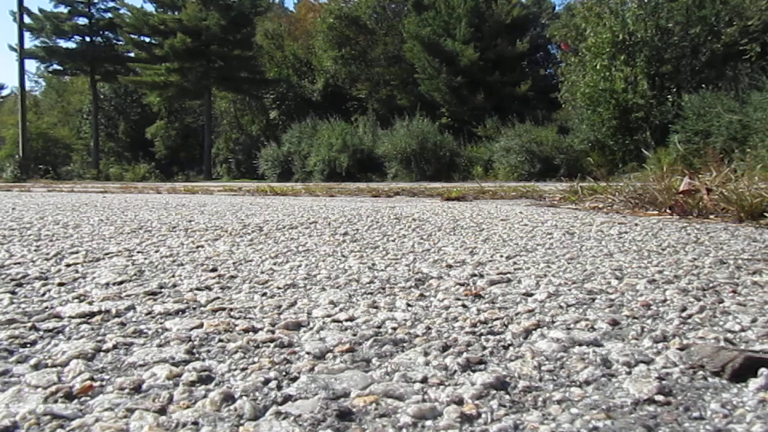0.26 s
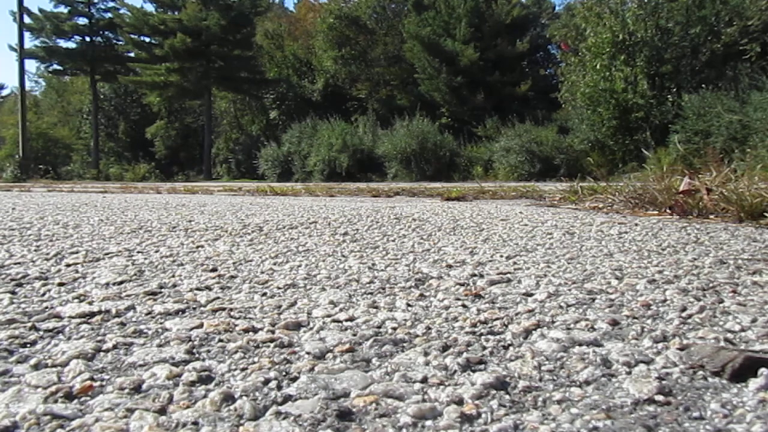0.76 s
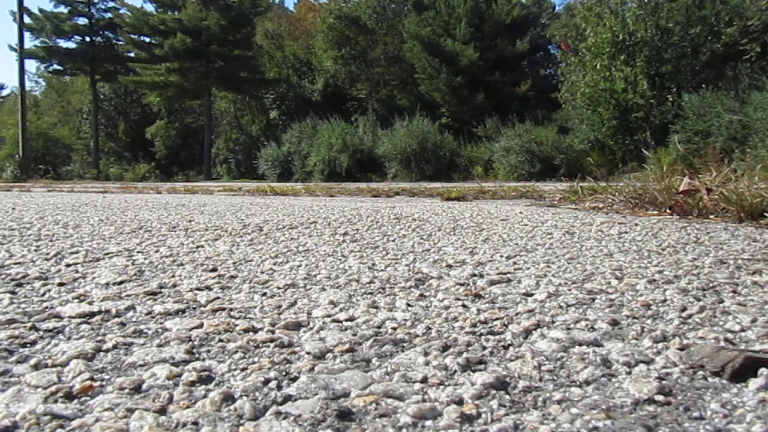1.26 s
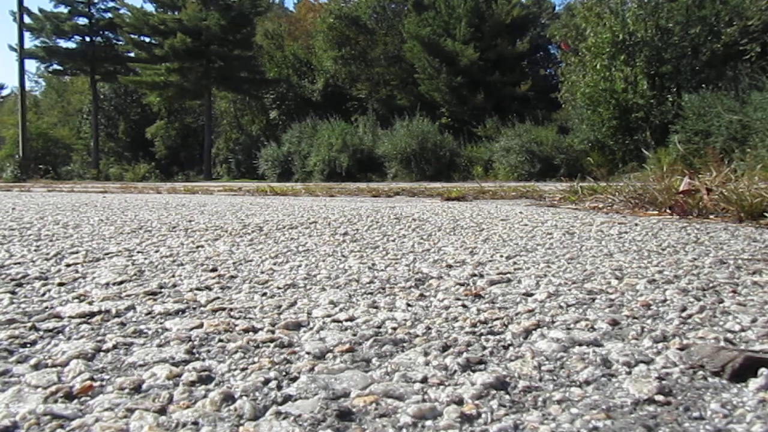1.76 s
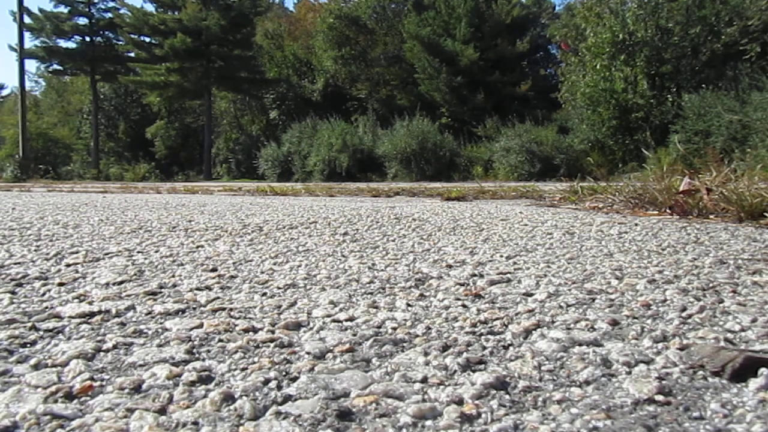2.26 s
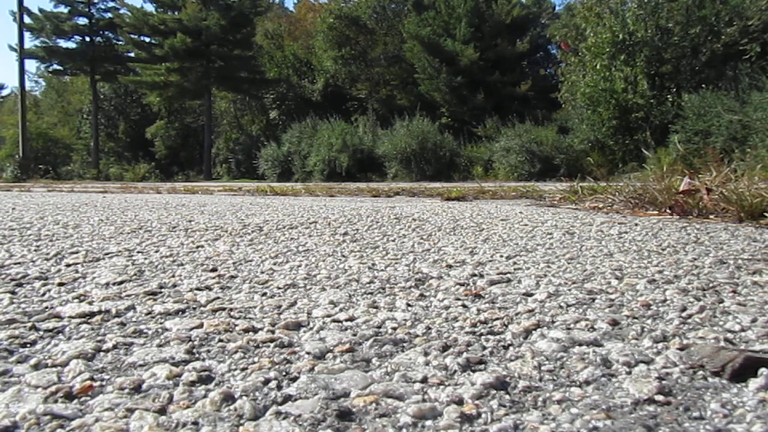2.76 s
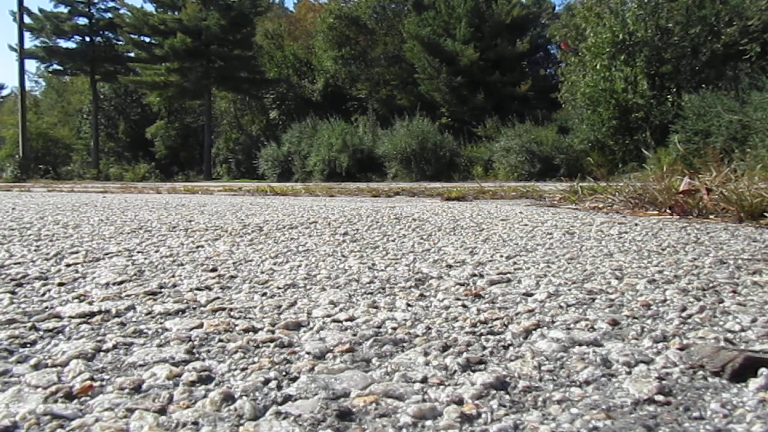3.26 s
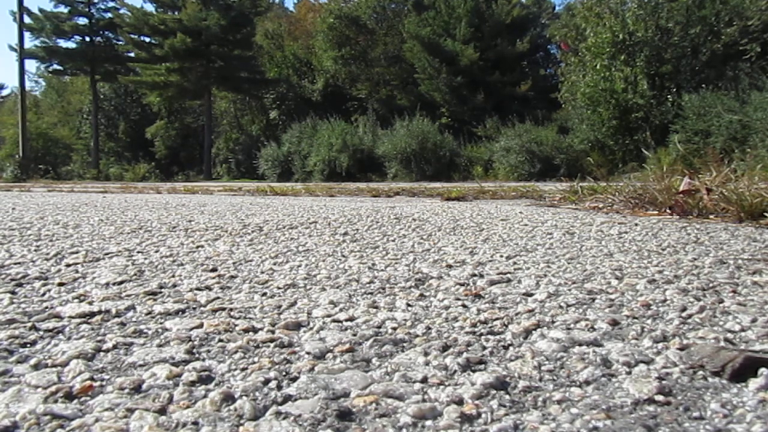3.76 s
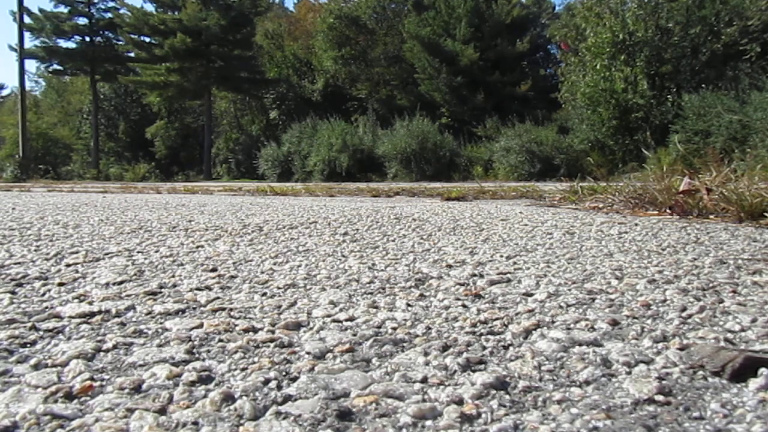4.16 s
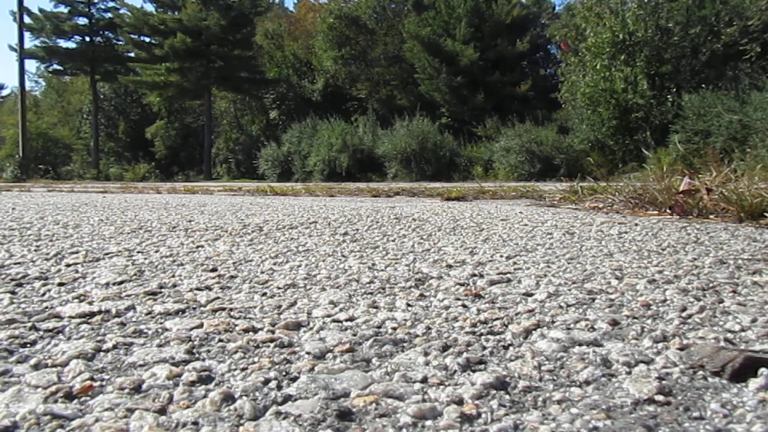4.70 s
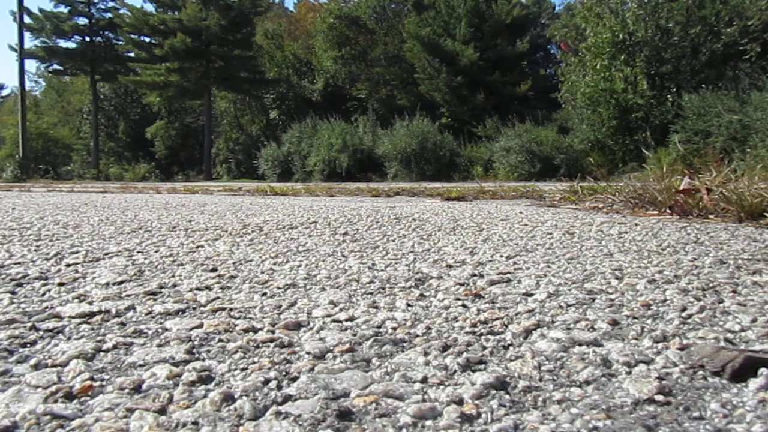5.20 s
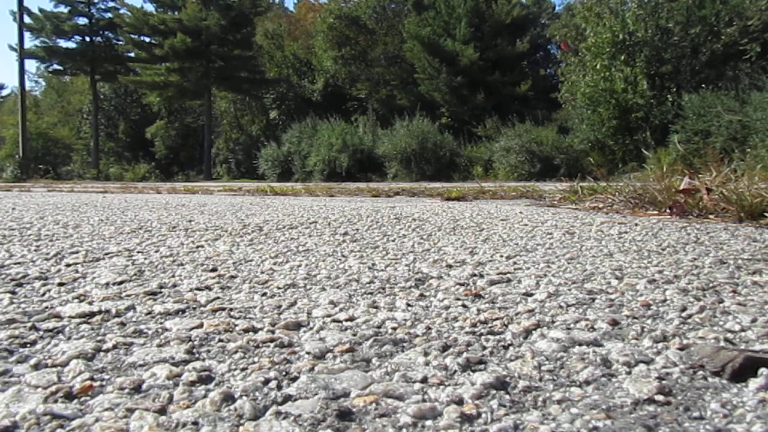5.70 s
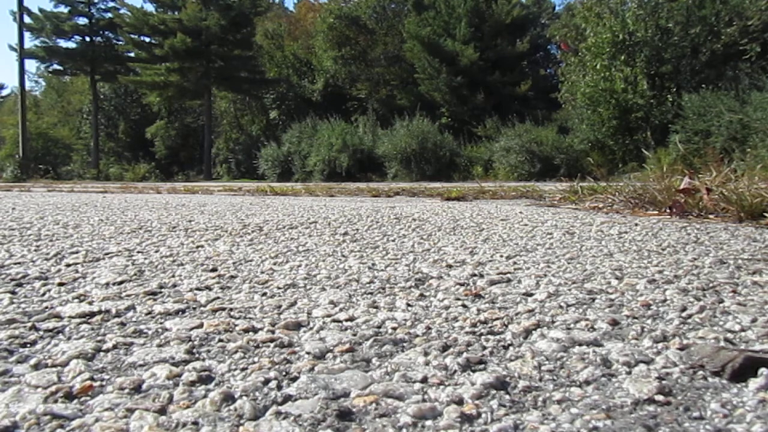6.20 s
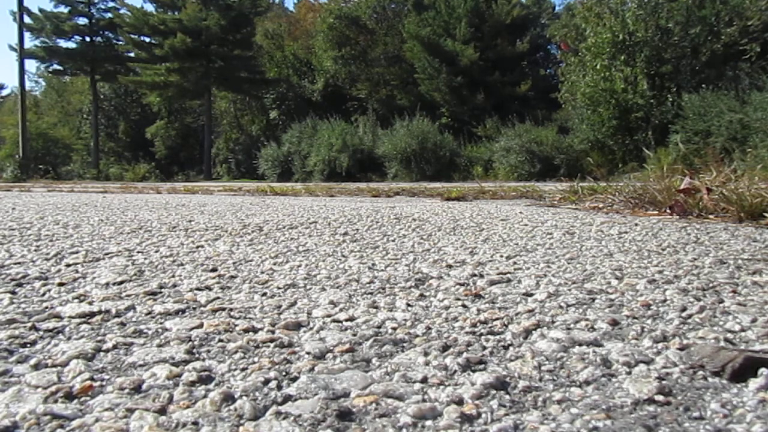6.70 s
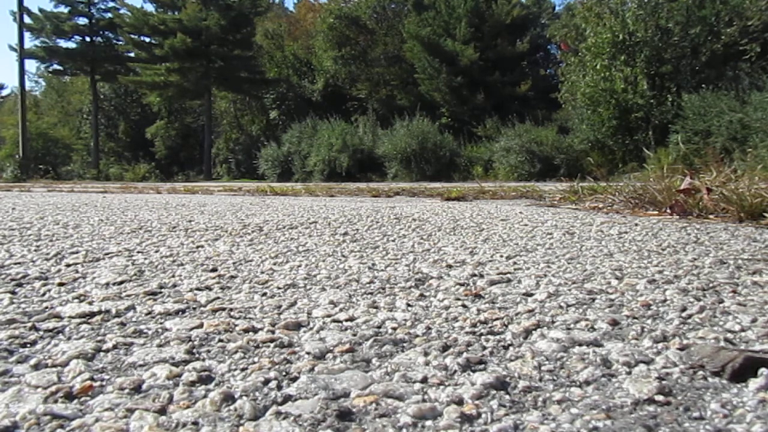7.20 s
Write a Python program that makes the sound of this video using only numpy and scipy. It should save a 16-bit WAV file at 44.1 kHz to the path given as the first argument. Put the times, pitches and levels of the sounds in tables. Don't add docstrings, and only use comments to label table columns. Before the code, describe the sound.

A loud open-exhaust four-cylinder car revs, coasts down past ground-level microphones crunching gravel, then idles away to the right, leaving faint crickets and breeze.

```python
import sys
import numpy as np
from scipy import signal
from scipy.io import wavfile
from scipy.ndimage import uniform_filter1d

SR = 44100
rng = np.random.default_rng(int(sys.argv[2]) if len(sys.argv) > 2 else 0)


def volts(x):
    e = np.asarray(x, float) / 20
    return 10 ** e


def pcm_store(signal):
    levels = np.round(np.clip(np.atleast_2d(signal), -1, 1) * 32767)
    wavfile.write(sys.argv[1], SR, levels.astype(np.int16).T)


N = 328545
T = np.arange(N) / SR
WHISTLE_HZ = 1384


def evened(x):
    return x / np.sqrt(np.mean(x ** 2) + 1e-20)


def read(points, hz):
    f, value = np.transpose(points)
    return np.interp(np.log(hz + 1), np.log(f + 1), value)


def curves(rows, t):
    s, *columns = np.transpose(rows)
    return [np.interp(t, s, c) for c in columns]


def resonate(x, hz, width):
    turn = np.exp(2j * np.pi * hz * np.arange(x.shape[-1]) / SR)
    r = np.exp(-np.pi * width / SR)
    return 2 * (turn * signal.lfilter([1 - r], [1, -r], x / turn)).real


def add(mix, s, sound):
    part = mix[round(s * SR):][:len(sound)]
    part += sound[:len(part)]


def firing_rate(t):
    # start_s, firing_hz
    engine = [(0.0, 178.1), (0.37, 202.2), (0.48, 204.7), (0.66, 191.9), (1.05, 169.3), (1.35, 143.6),
              (1.87, 104.6), (2.24, 78.3), (2.61, 50.3), (2.72, 45.07), (2.84, 42.2), (3.17, 32.31),
              (3.63, 26.82), (4.38, 22.93), (4.85, 23.65), (5.58, 20.92), (6.3, 22.29), (7.45, 27.1)]
    return curves(engine, t)[0]


def throttle_open(t):
    return np.clip((0.505 - t) / 0.07 + .5, 0, 1)


def car_away(t):
    # start_s, away (0 near to 1 far)
    distance = [
        (0, 0.051),
        (2.3, 0.27),
        (2.9, 0.35),
        (3.6, 0.54),
        (7.45, 0.73),
    ]
    return np.clip(curves(distance, t)[0], 0, 1)


def tailpipe(t):
    # start_s, level_db, gas_db (against that level)
    pipe_level = [(0, -2.5, -19.5), (.2, -2, -28.5), (.47, 3, -32.5), (.57, -4.5, -29.5), (.65, -8, -28),
                  (1.16, -4, -27.5), (1.62, 0, -29.5), (2.0, -0.5, -25.5), (2.4, 5, -35.5), (2.68, -8, -27),
                  (2.8, -11.5, -30), (3.4, -14.5, -24.5), (4.4, -14.5, -24.5), (5.19, -15, -23),
                  (5.3, -19.5, -25.5), (6.1, -12, -25.5), (6.38, -25, -19), (7.45, -18.5, -26)]
    drop_s, lowest_db, recover_db_per_s = 6.42, -21, 38
    level_db, gas_db = curves(pipe_level, t)
    drop_db = np.minimum(lowest_db + recover_db_per_s * (t - drop_s), 0)
    drop_db = drop_db * np.clip((t - drop_s) / .06, 0, 1)
    return level_db + drop_db, gas_db


def exhaust():
    # firing_hz, uneven_db (against the pipe), tilt_db (per octave, higher multiples)
    load = [(22, -36, -9.5), (29.6, -43.5, -8), (37.5, -42, -12.5), (47.4, -28.5, -9.5), (68.6, -79, -36),
            (109, -68, -12), (141, -58, -12), (172, -39, -12.5)]
    # pitch_hz, width_hz, level_db
    pipe = [(278, 12, 5.5), (504, 82, 8), (500, 31, -14), (743, 81, 2), (910, 290, 5.5), (1325, 18, 14),
            (2090, 40, -0.5)]
    # pitch_hz, level_db
    silencer = [(22, -53), (45, -28), (70, -23), (125, -18), (200, -23.5), (280, -28.5), (400, -34),
                (560, -44)]
    # multiple (of the firing rate), level_db, open_db (gained on the throttle),
    # slope_db (per octave of speed)
    multiples = [
        (1, -2, 0, 2.4),
        (2, -5, 0.5, 3),
        (3, -3.5, 7, -1),
    ]
    # quarter (of the firing rate), gain_db
    open_orders = [(3, -3.5), (5, 1.5), (6, -2.5), (7, 0.5), (9, 2.5), (10, -16), (11, -4), (14, 0.5),
                   (15, -6), (17, -15), (18, 1), (19, -3), (25, -1.5), (56, -12)]

    t = T[::8]
    hz, level_db = firing_rate(t), tailpipe(t)[0]
    throttle = throttle_open(t)
    unbuilt = np.clip(1 - t / 0.15, 0, 1)
    blaring = np.clip((0.385 - t) / 0.046 + .5, 0, 1)
    settling = np.exp(-((hz - 30.7) / 6.8) ** 2)
    echo = np.exp(-((t - 2.09) / 0.42) ** 2)
    steady = 1 - .7 * throttle - .5 * np.clip(2 - hz / 30, 0, 1)

    main_db = []
    for k, db, open_db, slope_db in multiples:
        speed_db = slope_db * np.log2(hz / 64)
        main_db.append(level_db + read(silencer, k * hz) + db + speed_db + open_db * throttle)
    first_db, second_db, third_db = main_db
    lift_dip_db = -13.5 * np.exp(-((t - 0.53) / 0.095) ** 2)
    blare_db = 17 * blaring / (1 + (2 * (3 * hz - 568) / 90) ** 2)
    low_db = {4: first_db - 46 * unbuilt + lift_dip_db + 6 * settling,
              8: second_db - 11 * echo + 9.5 * settling,
              12: third_db + blare_db - 2 * echo - 11.5 * settling}

    uneven_db, tilt_db = curves(load, hz)
    uneven_db = uneven_db + level_db + 12.5 * throttle - 14.5 * unbuilt
    tilt_db = tilt_db + 9.5 * throttle
    cycles = np.cumsum(hz) * 8 / SR / 4
    knots = np.arange(0, 7.6, 1 / 10)
    wander, offset = rng.standard_normal((56, len(knots))), rng.random(56)
    smear = 0.4476 * (np.arange(56) / 4) ** 2
    out = np.zeros(len(t))
    for q in range(3, 56):
        f, between = hz * q / 4, q % 4 > 0
        pipe_db = sum(g / (1 + (2 * (f - c) / w) ** 2) for c, w, g in pipe)
        drift = steady * np.interp(t, knots, wander[q])
        if q in low_db:
            db = low_db[q] + drift
        elif between:
            db = uneven_db + (-5.5 - 4.3 * throttle) * np.log2(max(q, 5) / 5) + 5 * drift
            db = db + throttle * curves(open_orders, q)[0]
        else:
            db = third_db + tilt_db * np.log2(q / 12) - 1.5 * settling + 5 * drift
        if q < 4:
            db = db + 5 + 13 * (blaring - throttle)
        phase = 2 * np.pi * (q * cycles + between * offset[q]) - smear[q] * np.clip(hz / 60, .55, 1)
        out += np.sqrt(2) * volts(db + pipe_db) * (f < 2400) * np.cos(phase)

    jitter_db = 0.72 + 1.8 * np.clip(1 - hz / 60, 0, 1)
    strength = rng.standard_normal(1000)[(4 * cycles + .5).astype(int) % 1000]
    out *= volts(jitter_db * uniform_filter1d(strength, size=24))
    return signal.resample_poly(out, 8, 1)[:N]


def whine():
    # multiple (of the firing rate), level_db, open_db (gained on the throttle)
    whine_orders = [(3, -6, -20), (4, -4, 5), (5, -10, -4), (6, -14, 5), (7, -9, -8), (7.5, -10, -3),
                    (8, -10, -3), (9, -5, -6), (10, -11, -3), (10.5, -11, 5), (11, -12, -4)]
    knee_hz = 160
    hz = firing_rate(T)
    beat = np.cumsum(hz) / SR
    knots = np.arange(0, 7.6, 1 / 12)
    wander = rng.standard_normal((len(whine_orders), len(knots)))
    lines = np.zeros(N)
    for (k, db, open_db), w in zip(whine_orders, wander):
        waver_db = 4 * np.interp(T, knots, w)
        lip_db = 10 / (1 + (2 * (k * hz - WHISTLE_HZ) / 260) ** 2)
        box_db = 7 / (1 + (2 * (k * hz - 770) / 220) ** 2)
        line_db = db + waver_db + open_db * throttle_open(T) + lip_db + box_db
        lines += volts(line_db) * np.cos(2 * np.pi * k * beat + k ** 2)
    fade_db = .22 * np.maximum(knee_hz - hz, 0)
    mask_db = .13 * np.maximum(hz - knee_hz, 0)
    return np.sqrt(2) * volts(-38 - fade_db - mask_db) * lines


def intake():
    # pitch_hz, width_hz, level_db, start_s, length_s
    howls = [
        (718, 96, -39, 0, .36),
        (125, 42, -36, .98, .15),
        (212.4, 27, -38, 2.5, .95),
        (800, 600, -42, 4.8, .47),
        (138, 30, -37, .5, .6),
        (105, 40, -46, .55, .55),
        (270, 90, -33, .44, .26),
    ]
    out = np.zeros(N)
    for (hz, width, db, start, length), air in zip(howls, rng.standard_normal((len(howls), 2 * SR))):
        t = np.arange(0, length, 1 / SR)
        howl = evened(resonate(resonate(air[:len(t)], hz, width), hz, width))
        edge_s = np.minimum(t + (start == 0), length - t)
        add(out, start, howl * volts(db) * np.clip(edge_s / 0.085, 0, 1))
    return out


def noise(near, far, patchy_db, flicker_db):
    # pitch_hz, likeness (0 to 1)
    same_sides = [(60, 1), (250, 0.92), (1200, 1), (3000, 1), (6500, 0.81), (9500, 1), (13000, 1)]
    frames, hz = N // 256 + 5, np.fft.rfftfreq(1024, 1 / SR)
    a, b, c, d, patches = rng.standard_normal((frames, 513, 5)).T
    patches = uniform_filter1d(patches, size=10, axis=0)
    patches = evened(uniform_filter1d(patches, size=12, axis=1))
    flicker = evened(uniform_filter1d(rng.standard_normal(frames), size=3))
    away = car_away(np.arange(frames) * 256 / SR - 512 / SR)
    colour = volts(np.outer(read(near, hz), 1 - away) + np.outer(read(far, hz), away))
    colour /= np.linalg.norm(colour, axis=0)
    same = np.clip(np.outer(read(same_sides, hz), 1 - 0.11 * away), -1, 1)
    left = a + 1j * b
    z = np.array([left, same * left + np.sqrt(1 - same ** 2) * (c + 1j * d)])
    z *= colour * volts(patchy_db * patches + flicker_db * flicker)
    return evened(signal.istft(z, nperseg=1024, noverlap=768)[1][:, :N])


def grit(hiss_db):
    snaps_per_s, spread_db = 160, 4.5
    size = volts(spread_db * np.minimum(rng.exponential(1, N), 5)) * (rng.random(N) < snaps_per_s / SR)
    snap = rng.standard_normal(400) * signal.windows.tukey(400, .2) * np.exp(-np.arange(400) / 59.0)
    bright = signal.butter(4, [2500, 8000], "bandpass", fs=SR, output="sos")
    snaps = signal.sosfilt(bright, signal.oaconvolve(size, snap)[:N])
    return evened(snaps) * volts(hiss_db - 6.5)


def turbulence():
    # start_s, level_db
    tyres = [(0.0, -50), (0.12, -47.5), (1.06, -45.5), (1.5, -41), (2.1, -37.5), (2.4, -43.5),
             (2.57, -36.5), (2.8, -43), (3.09, -47), (3.28, -49.5), (3.63, -49.5), (3.86, -52.5),
             (4.29, -53), (4.5, -56.5), (5.2, -56), (5.28, -61.5), (6.2, -56.5), (7.45, -56.5)]
    # pitch_hz, level_db (per Hz)
    rumble_near = [(24, -42), (40, -36), (178, -0.5), (217, -1), (623, -7), (751, -3), (800, -1),
                   (1040, -43), (1760, -120)]
    # pitch_hz, level_db (per Hz)
    rumble_far = [(25, -34), (45, -16), (90, -6), (170, -2), (300, 0), (450, -5), (800, -15), (1200, -45)]
    # pitch_hz, level_db (per Hz)
    roar_colours = [
        [(180, -25), (300, -7), (637, 1), (1260, 1.5), (1370, -1.5), (1660, -3.5), (1970, 0), (3200, -11), (4160, -30), (7040, -120)],
        [(180, -62), (300, -21), (588, -4.5), (669, -12), (724, -6), (1020, -4), (1600, -5), (3200, -20), (4160, -48), (7040, -120)],
    ]
    # pitch_hz, level_db (per Hz)
    hiss_colours = [
        [(2500, -3), (3300, -14), (4000, -11), (5000, -2.5), (6500, -8.5), (8000, -12), (9500, -14), (11000, -36.5), (13000, -20), (15000, -57)],
        [(2500, -38), (3300, 3.5), (4000, -10.5), (5000, -6), (6500, -8), (8000, -6.5), (9500, -15), (11000, -7), (13000, -22), (15000, -23.5)],
    ]
    gate, roar_gate = 0.17, 0.15
    rumble_db, hiss_db, away = sum(tailpipe(T)), curves(tyres, T)[0], car_away(T)
    roar_gain = np.hypot(volts(hiss_db + 16 * (1 - away)), volts(-41))
    beat = np.cumsum(firing_rate(T)) / SR
    puffs = np.exp(np.cos(2 * np.pi * beat) - 1)
    rumble = noise(rumble_near, rumble_far, 0.94, 0.11) * evened(1 - gate + gate * puffs) * volts(rumble_db)
    roar = noise(*roar_colours, 0.78, 0.76) * evened(1 - roar_gate + roar_gate * puffs) * roar_gain
    hiss = noise(*hiss_colours, 1.6, .7) * volts(hiss_db)
    return rumble + roar + hiss + grit(hiss_db - 6 * away)


def whistle():
    # firing_hz, level_db
    by_speed = [
        (88, -93),
        (106, -53),
        (117, -42),
        (129, -44),
        (138, -40),
        (148, -40),
        (160, -44),
        (195, -46),
        (204, -40),
    ]
    # centre_s, gain_db
    flashes = [
        (.43, 10),
        (1.22, 12),
        (1.33, 11),
        (1.42, -3),
        (1.62, 9),
    ]
    width_hz = 22
    air = resonate(resonate(rng.standard_normal(N), WHISTLE_HZ, width_hz), WHISTLE_HZ, width_hz)
    flash_db = sum(db * np.exp(-((T - s) / .024) ** 2) for s, db in flashes)
    level_db = curves(by_speed, firing_rate(T))[0] + flash_db
    return evened(air) * volts(level_db) * np.clip(T / 0.72, 0, 1)


def gravel():
    # start_s, peak_db, ring_hz, length_s
    crushed = [(1.61, -33, 610, 0.019), (1.788, -36, 552, 0.015), (1.919, -13, 870, 0.026),
               (2.151, -7.5, 700, 0.023), (2.314, -13, 820, 0.035), (2.389, -16.5, 960, 0.022),
               (2.513, -14.5, 1860, 0.061), (2.653, -14.5, 604, 0.069), (2.67, -19.5, 1230, 0.078),
               (2.692, -32, 1040, 0.0088), (2.749, -17.5, 770, 0.038), (2.81, -21, 869, 0.028)]
    # start_s, peak_db, ring_hz, length_s
    cobbles = [
        (1.954, -8, 876, 0.016),
        (2.163, -12, 910, 0.057),
        (2.187, -28.5, 990, 0.029),
        (2.503, -8, 580, 0.031),
        (2.519, -17, 950, 0.048),
        (2.545, -7, 980, 0.021),
    ]
    # start_s, peak_db
    pebbles = [(3.078, -35), (3.172, -24), (3.193, -33), (3.238, -27), (3.31, -33), (3.41, -47),
               (3.47, -46), (3.555, -30), (3.664, -28.5), (3.704, -27), (3.764, -26.5), (3.949, -33),
               (4.032, -29.5), (4.118, -29), (4.327, -36), (4.605, -31), (4.79, -32.5)]
    # start_s, peak_db, ring_hz
    ticks = [
        (4.372, -35, 3500),
        (5.324, -44, 3464),
        (6.15, -34, 3180),
        (6.203, -31, 3070),
        (6.379, -33, 4560),
        (6.392, -34, 1260),
    ]
    rings = rng.uniform(545, 1290, len(pebbles))
    rows = [(s, db, hz, -19, -9, length) for s, db, hz, length in crushed]
    rows += [(s, db, hz, -24, -13, length) for s, db, hz, length in cobbles]
    rows += [(s, db, hz, -9, 3.5, 0.022) for s, db, hz in ticks]
    rows += [(s, db, hz, -13, -9, 0.02) for (s, db), hz in zip(pebbles, rings)]
    return rows


def stones():
    ring_width_hz, ring_db, grain_db = 140, -6.5, 1.5
    out, t = np.zeros(N + 6144), np.arange(6144) / SR
    rows = gravel()
    grains = rng.standard_normal((len(rows), 3, 6144))
    body = signal.butter(4, [450, 3400], "bandpass", fs=SR, output="sos")
    bright = signal.butter(3, [4200, 8500], "bandpass", fs=SR, output="sos")
    for (s, db, hz, treble_db, body_db, length), (low, high, clump) in zip(rows, grains):
        fall_s = max(length, .005)
        shape = (1 - np.exp(-t / (.6 * fall_s))) * np.exp(-(t / fall_s) ** 2)
        ragged = volts(grain_db * evened(uniform_filter1d(clump, size=120)))
        ring = resonate(low * ragged, hz, ring_width_hz)
        thud = signal.sosfilt(body, low * ragged)
        scrape = signal.sosfilt(bright, high * ragged)
        strength = np.sqrt(np.mean(shape ** 2))
        ring, thud, scrape = (evened(shape * p) * strength for p in (ring, thud, scrape))
        stone = volts(ring_db) * ring + volts(body_db) * thud + volts(treble_db) * scrape
        out[round(s * SR):][:6144] += volts(db) * stone
    return out[:N]


def groans():
    # start_s, length_s, from_hz, to_hz, level_db
    moans = [
        (1.823, 0.099, 203, 266.2, -29.5),
        (1.88, .14, 214, 324, -31),
        (1.989, 0.151, 200.5, 280, -27),
        (2.101, 0.106, 275, 309, -29),
    ]
    out = np.zeros(N)
    for s, length, from_hz, to_hz, db in moans:
        u = np.arange(0, length, 1 / SR) / length
        turns = np.cumsum(from_hz + (to_hz - from_hz) * u) / SR
        add(out, s, np.sqrt(2) * volts(db) * np.sin(np.pi * u) ** 0.35 * np.sin(2 * np.pi * turns))
    return out


def knocks():
    # centre_s, peak_db, ring_hz
    hollow = [(1.94, -18, 900), (1.972, -8.5, 850), (1.984, -15, 870), (2.159, -17, 1170),
              (2.168, -21, 897), (2.174, -14, 950), (2.182, -15, 980), (2.197, -13, 1000), (2.33, -22, 825),
              (2.513, -11.5, 605), (2.525, -10, 754), (2.531, -13, 990), (2.535, -14, 1010),
              (2.545, -9, 979), (2.558, -13, 656), (2.557, -22, 1990), (2.567, -9, 950), (2.671, -21, 1200),
              (2.761, -28, 740), (4.374, -38, 2227), (4.381, -36, 1980), (4.388, -49, 3680),
              (4.396, -43, 3680), (5.326, -41, 4690), (5.329, -45, 3600), (6.162, -41, 5000),
              (6.211, -32, 3500), (6.216, -39, 5100), (6.387, -36, 4500), (6.402, -40, 7000),
              (5.327, -39, 1196), (5.332, -40, 1205), (6.157, -27, 1020), (6.163, -39, 448),
              (6.214, -26, 1260), (6.299, -34, 1200), (6.4, -24.5, 900)]
    # start_s, peak_db
    snaps = [(2.258, -28), (2.3035, -31), (2.3147, -25), (2.327, -21.5), (2.471, -30), (2.5, -28),
             (2.5214, -24), (2.7197, -28), (2.7593, -26), (2.839, -37), (2.8902, -35), (3.0733, -34),
             (3.0966, -29), (3.1736, -27), (3.206, -29), (3.2474, -29), (3.411, -34), (3.4727, -31),
             (3.5293, -36), (3.662, -35), (3.7079, -41), (3.9558, -38), (4.0351, -39), (4.1204, -41),
             (4.3264, -37), (4.5929, -42), (4.7615, -42), (4.962, -43), (5.083, -45), (5.2184, -52),
             (5.3247, -39), (6.1553, -42), (6.2106, -46), (6.386, -28), (6.959, -55)]
    knock_s, snap_s = 0.001, 0.0038
    out, t = np.zeros(N), np.arange(880) / SR
    from_centre = t - .01
    for s, db, hz in hollow:
        shape = np.exp(-(from_centre / knock_s) ** 2 / 2)
        add(out, s - .01, volts(db) * shape * np.cos(2 * np.pi * hz * from_centre))
    bright = signal.butter(2, [3800, 9000], "bandpass", fs=SR, output="sos")
    for (s, db), crack in zip(snaps, rng.standard_normal((len(snaps), 880))):
        crack = signal.sosfilt(bright, crack * np.exp(-t / snap_s))
        add(out, s, volts(db - 0.5) * crack / abs(crack).max())
    return out


def fan():
    # pitch_hz, level_db
    hum = [
        (172.3, -47),
        (258.4, -51),
        (344.5, -54),
    ]
    heard = np.interp(T, [2.9, 3.5, 6.35, 6.48], [0, 1, 1, 0])
    return heard * sum(np.sqrt(2) * volts(db) * np.sin(2 * np.pi * hz * T) for hz, db in hum)


def crickets():
    # pitch_hz, width_hz, level_db, start_s
    insects = [
        (4600, 95, -62.5, 6.2),
        (4350, 120, -65, 6.45),
        (8550, 330, -66, 4.7),
    ]
    chirps = [
        [6.57, 6.699, 6.81, 6.85, 6.89, 7.05, 7.14, 7.19, 7.24, 7.31, 7.37, 7.44],
        [6.7, 6.87, 6.97, 7.05, 7.13, 7.3, 7.44],
    ]
    throbs = []
    for times in chirps:
        throbs.append(.45 + sum(np.exp(-((T - s) / .016) ** 2) for s in times))
    throbs.append(1)
    out = np.zeros((2, N))
    for (hz, width, db, start), throb in zip(insects, throbs):
        air = rng.standard_normal(N) + 0.12 * rng.standard_normal((2, N))
        song = evened(resonate(resonate(air, hz, width), hz, width))
        out += volts(db) * song * throb * np.clip((T - start) / 0.54, 0, 1)
    return out


def wind():
    # centre_s, peak_db, length_s
    buffets = [(5.141, -36, .006), (5.2, -32, .008), (5.238, -22, 0.011), (5.33, -33, .008),
               (5.393, -27, 0.0038), (5.472, -35, 0.0062), (5.542, -37, 0.0062), (5.659, -29, 0.0048),
               (5.775, -31, .014), (5.832, -26, 0.0097), (5.918, -36, 0.0061), (6.01, -24, 0.0076),
               (6.065, -24, 0.012), (6.1, -23, 0.006), (6.139, -25, .005), (6.227, -14, .0065),
               (6.298, -35, 0.014), (6.363, -28, 0.0045), (6.397, -19, 0.0081), (6.447, -29, 0.0032),
               (6.51, -41, 0.0036), (6.632, -47, 0.012), (6.714, -41, .01), (6.883, -51, .013),
               (7.167, -40, .007), (7.355, -33, 0.0064), (7.429, -39, 0.011)]
    # share (of its pitch), level_db
    thump_parts = [
        (.5, -6),
        (1, 0),
        (1.6, -10),
        (2.4, -21),
    ]
    breeze_hz, breeze_width_hz, lean_db = 110, 200, -1.5
    lumps = volts(4.2 * evened(uniform_filter1d(rng.standard_normal(N), size=900)))
    flutter = resonate(rng.standard_normal(N) * lumps, breeze_hz, breeze_width_hz)
    flutter = resonate(flutter, breeze_hz, breeze_width_hz)
    rise = np.clip((T - 5.15) / 0.041, 0, 1)
    lull = volts(-13 * np.clip((T - 6.46) / 0.022, 0, 1))
    out = evened(flutter) * volts(-45) * rise * lull
    t = np.arange(-.04, .04, 1 / SR)
    for (s, db, length), (pitch, *turns) in zip(buffets, rng.random((len(buffets), 5))):
        hz = 85 + (135 - 85) * pitch
        thump = np.zeros(len(t))
        for (k, g), turn in zip(thump_parts, turns):
            thump += volts(g) * np.cos(2 * np.pi * (k * hz * t + turn))
        add(out, s + t[0], volts(db) * np.exp(-(t / length) ** 2 / 2) * thump)
    return np.array([out * volts(lean_db), -out / volts(lean_db)])


def ports(x):
    # start_s, bearing (1 left to -1 right)
    bearings = [
        (0, 0.85),
        (2.3, 0.84),
        (2.7, 0.39),
        (3.1, -0.32),
        (3.6, -0.53),
        (4.1, -0.87),
        (6.3, -0.95),
        (7.45, -0.93),
    ]
    # pitch_hz, level_db
    shadow = [
        (60, 0.5),
        (250, 0.7),
        (600, 2),
        (1200, 3.5),
        (3000, 2.5),
        (4500, 2.5),
        (6500, 0.5),
        (9500, -1.5),
    ]
    # pitch_hz, level_db, phase_rad
    mismatch = [
        (40, -1.9, 0.08),
        (100, -1.9, 0.23),
        (260, 0, 0.23),
        (700, 0, 0.085),
        (1490, 0.2, 0.066),
    ]
    # start_s, climb_hz (in the first second), width_hz, depth_db
    nulls = [
        (6.475, 640, 95, 16),
        (6.73, 520, 100, 21),
    ]
    gap_s = 4.5e-5
    hz, t, z = signal.stft(x, SR, nperseg=1024, noverlap=768)
    bearing = curves(bearings, t)[0]
    half = volts(np.outer(read(shadow, hz), bearing) / 2)
    half = half * np.exp(1j * np.pi * gap_s * np.outer(hz, bearing))
    off_hz, off_db, off_turn = np.transpose(mismatch)
    off = volts(np.interp(hz, off_hz, off_db) / 2) * np.exp(.5j * np.interp(hz, off_hz, off_turn))
    half *= off[:, None]
    pitch, cut_db = hz[:, None], 0
    for s, rise, width, db in nulls:
        null_hz = rise * np.maximum(t - s, 0) ** .45
        cut_db = cut_db + db * (t > s) * np.exp(-((pitch - null_hz) / width) ** 2 - (pitch / 520) ** 2)
    z *= np.array([half, 1 / half]) * volts(-cut_db)
    return signal.istft(z, SR, nperseg=1024, noverlap=768)[1][:, :N]


def scene():
    car = exhaust() + whine() + intake() + turbulence() + whistle() + fan()
    ground = stones() + groans() + knocks()
    return ports(car + ground + crickets()) + wind()


def roll_off(x):
    return signal.sosfilt(signal.butter(12, 14400, fs=SR, output="sos"), x)


def record(dry):
    cut = signal.sosfilt(signal.butter(3, 40, "highpass", fs=SR, output="sos"), dry)
    cut = signal.sosfilt(signal.butter(4, 12500, fs=SR, output="sos"), cut)
    shared = cut.mean(0)
    dull = signal.sosfiltfilt(signal.butter(10, 10700, fs=SR, output="sos"), shared)
    dulled = (T < 2.585) | (T > 3.38) & (T < 4.7)
    cut = cut - (shared - dull) * dulled
    return roll_off(cut)


dry = scene()
out = record(dry)
pcm_store(out)
```